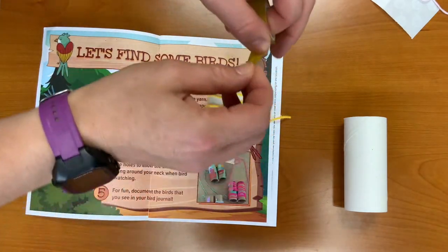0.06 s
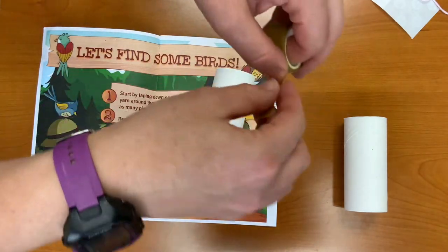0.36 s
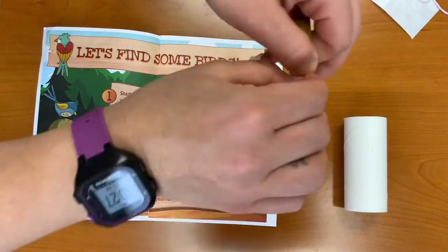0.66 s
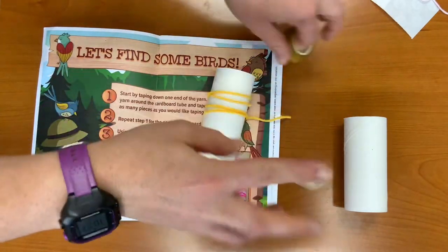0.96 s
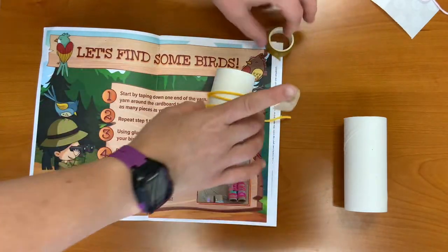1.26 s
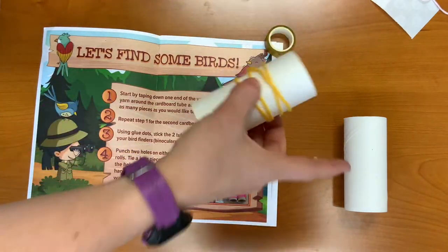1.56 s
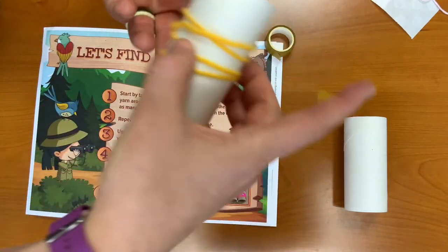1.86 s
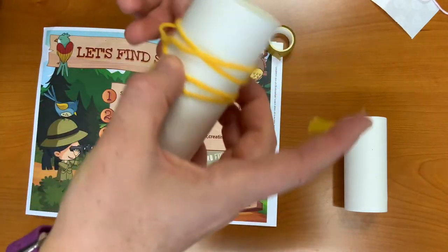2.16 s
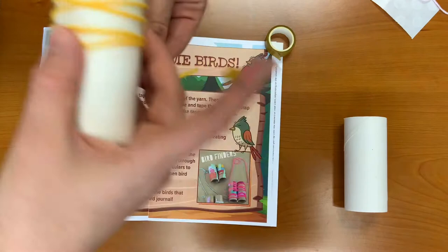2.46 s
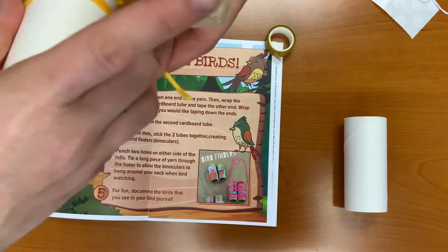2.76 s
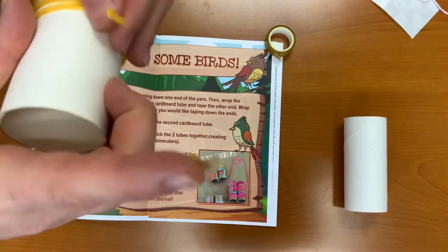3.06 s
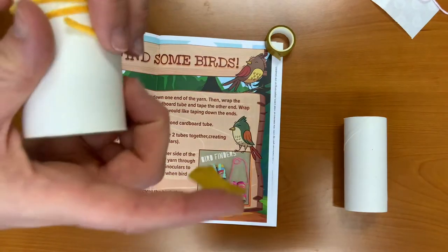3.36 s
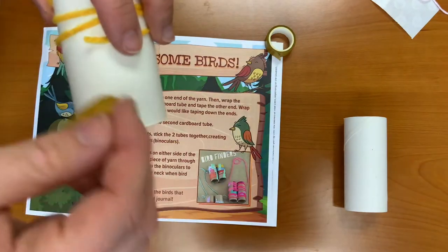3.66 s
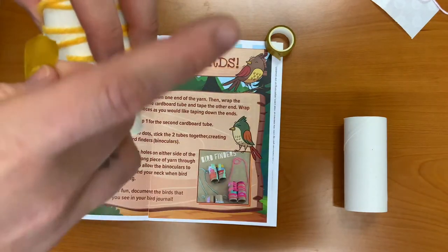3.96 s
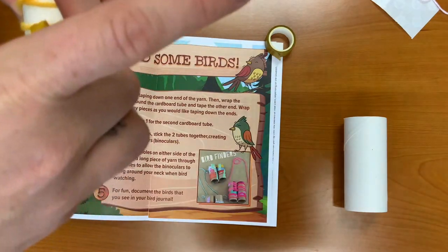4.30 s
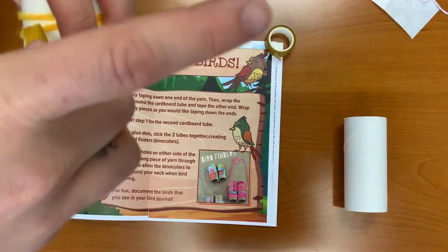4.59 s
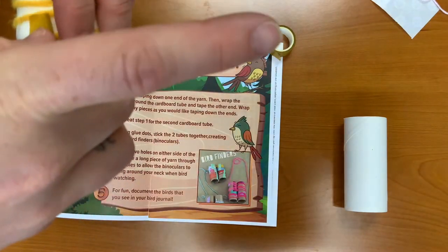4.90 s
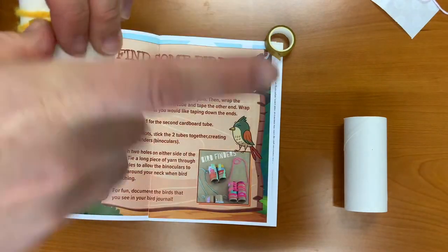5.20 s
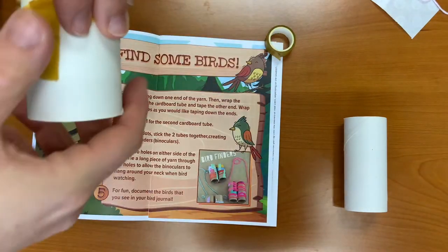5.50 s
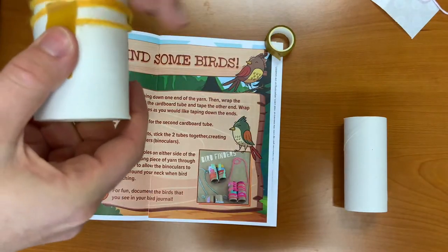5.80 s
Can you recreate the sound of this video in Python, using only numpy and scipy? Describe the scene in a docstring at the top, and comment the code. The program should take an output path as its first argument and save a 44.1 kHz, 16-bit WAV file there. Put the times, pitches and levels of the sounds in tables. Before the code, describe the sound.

In a small room with a steady low hum, someone tapes a cardboard tube close to the microphone. A fading hiss and brief crackly rips of tape come first, then the roll knocks twice on a wooden desk. Soft rubbing and faint bumps on the tube follow, broken by one loud, sharp snap of sticky tape leaving a finger and a few smaller snaps near the end.

```python
"""A wooden desk in a small room with a low ventilation hum: taping a cardboard tube.
A tape pull fades in a hiss, then tape peels off its roll in short rips; the roll is set down with a
double knock and a soft scuff. Fingers slide over the tube and press the tape on, which snaps as it
lets go of the skin; a brief crackling swell leads into the loudest snap. Faint bumps on the tube
and brushing arms lie underneath."""
import sys
import numpy as np
from scipy import signal
from scipy.fft import rfft, irfft, next_fast_len
from scipy.io import wavfile
from scipy.ndimage import uniform_filter1d, map_coordinates

SR = 44100
rng = np.random.default_rng(int(sys.argv[2]) if len(sys.argv) > 2 else 0)


def dump_mix(stems):
    """Bounce the given channels to the path in sys.argv[1] as a 16-bit WAV at rate SR."""
    frames = np.atleast_2d(stems).T  # one column per channel
    limited = np.clip(frames, -1, 1)  # hard clip at full scale
    pcm = np.round(limited * 32767).astype(np.int16)
    wavfile.write(sys.argv[1], SR, pcm)


N = 257544

# hollow tube spectrum: freq_hz, level_db
TUBE = [(150, -5), (350, 9), (600, -3.5), (1050, 1.5), (1400, -1), (1850, 2.5), (2600, -11.5), (4500, -6.5),
        (9000, -45)]
# cardboard resonances under the tape: freq_hz, width_hz, level_db
CORE = [(1140, 55, -13), (2000, 160, -23), (2600, 300, -18), (3080, 400, -11), (3870, 300, -15),
        (4400, 260, -13), (5200, 380, -10), (6100, 260, -12), (7250, 380, -13)]


def rubbing():
    """Sliding friction, mostly fingers on tape and tube: fine hiss, resonant rasp, hollow body."""
    # slides: start_s, length_s, level_db, swell_db, rasp_offset_db, tube_offset_db
    # -0.03 s: fading hiss of a tape pull; 1.115 s: soft, low scuff of the roll sliding on the desk
    slides = [(-.03, 0.09, -45, -26, -8, -13), (0.07, .19, -61.5, 2.5, -21, -15.5),
              (0.298, 0.11, -71, -4, -12, -9), (0.441, 0.02, -71.5, -2, -21, -18),
              (0.559, 0.077, -77, 8, -26, -24), (0.641, 0.064, -55.5, 11, -27, -16),
              (0.773, 0.1, -68.5, 29.5, -14, -8), (1.115, 0.026, -64.5, -6.5, -6, 13.5),
              (1.248, 0.066, -66, 10, 6, -4.5), (1.31, 0.38, -80, -7, 4.5, -5.5),
              (1.494, 0.037, -74, 0, 5, -22), (1.721, 0.076, -70, 5.5, 6.5, -9),
              (1.826, 0.085, -75.5, 5.5, 9.5, -5), (2.07, 0.16, -84, 15, 12, -3.5),
              (2.225, 0.091, -62.5, 10.5, 12.5, -11), (2.295, 0.5, -64, -19.5, 4, -12),
              (2.704, 0.075, -53.5, 11.5, 3.5, -12), (2.84, 0.029, -63.5, 3, -14, -15),
              (2.877, 0.01, -53, 2, 4, -28), (2.889, 0.2, -57, -0.5, -2, -22),
              (3.111, 0.22, -65.5, -23, 6.5, -21.5), (3.27, 0.1, -54.5, 4.5, -1, -18.5),
              (3.478, 0.1, -75.5, -16, 7.5, -7), (3.56, .03, -68.5, 13.5, -10, -0.5),
              (3.586, 0.0042, -52.5, 8, 7, -20), (3.639, 0.084, -60, 15.5, -18, -24),
              (3.72, 0.036, -62, -2, -10, -5), (3.805, 0.058, -63.5, 4, -27, -25),
              (3.967, 0.072, -79.5, 10, -10.5, -15.5), (4.038, 0.035, -60.5, -4.5, -8.5, -22),
              (4.655, 0.067, -79, 4.5, 6.5, -8.5), (4.875, 0.16, -74.5, 8, 5.5, -9),
              (5.054, 0.05, -77, 5, 4, -1.5), (5.101, 0.051, -63, 21, 3.5, -10),
              (5.187, 0.067, -70.5, -2, -4, -22), (5.25, 0.054, -66.5, 13.5, -21, -24.5),
              (5.414, 0.022, -61.5, -3.5, -6, -16.5), (5.46, 0.057, -63, -9, 3, -9.5),
              (5.534, 0.16, -62, -7, -3, -17), (5.647, 0.058, -60, 9, 0, -12),
              (5.745, 0.1, -72, 37, 0, -14.5)]
    # friction spectrum: freq_hz, level_db
    hiss_shape = [(1500, -35.5), (3000, -5), (4300, -5.5), (6000, 0.5), (8300, 2.5), (10000, 4.5),
                  (13000, 4), (15500, -1.5)]
    # hand-tube gap, low and high resonance: freq_hz, width_hz
    gap_modes = [(3300, 900), (6750, 1150)]
    # low resonance re high as the palm cups the tube: time_s, level_db
    cupping = [(.3, -15), (.9, 4), (1.298, -16), (2.35, -6.5), (3.2, -20), (3.5, -32), (5.0, -11)]
    power, t = np.zeros((3, N)), np.arange(SR) / SR
    for start_s, length_s, db, swell_db, rasp_db, tube_db in slides:
        envelope = slide_gain(t - min(start_s, 0), length_s, swell_db)
        add(power, start_s, (amp([[db], [db + rasp_db], [db + tube_db]]) * envelope) ** 2)
    hiss_gain, rasp_gain, tube_gain = np.sqrt(power)
    pressure_db = 1.3 * wobble(45) + .9 * wobble(250)  # uneven press, catching on the grain
    catches = unit(film(slips(rate_hz=4.1, spread_db=3.5), tilt_db_oct=-1, core_db=-1.5))
    rub = friction(lambda x: coloured(x, hiss_shape) + amp(3) * resonate(x, CORE), 8600, scatter_db=-44)
    hiss = hiss_gain * (amp(2.5) * rub + amp(-25) * catches)
    low, high = [friction(lambda x: steep_band(x, hz, width_hz), rate_hz=7600, scatter_db=-20.5)
                 for hz, width_hz in gap_modes]
    cup_db = np.interp(np.arange(N) / SR, *np.transpose(cupping))
    rasp = rasp_gain * amp(-8) * (high + amp(cup_db) * low)
    tube = tube_gain * friction(lambda x: coloured(x, TUBE), rate_hz=5000, scatter_db=2.5)
    return room(patchy(amp(pressure_db) * (hiss + rasp + tube), depth_db=2.2), wet_db=-32.5)


def slide_gain(t, length_s, swell_db):
    """Soft rise, a hold that swells or sags, then release."""
    attack_s, release_db_per_s = min(.016 + .12 * length_s, length_s), 300
    rise = np.sin(np.pi / 2 * np.clip(t / attack_s, 0, 1)) ** 2
    hold_db = swell_db * (np.clip(t / length_s, 0, 1) - .5)
    return rise * amp(hold_db - release_db_per_s * np.maximum(t - length_s, 0))


def snaps():
    """Adhesive lets go of the skin all at once; the taut film flicks, then flutters."""
    # releases: start_s, level_db, tilt_db_oct, core_db
    releases = [(0.17, -18.5, -8, 1), (0.3383, -38.5, -11, -3), (0.6497, -33, -2, -10),
                (0.6888, -31, -6, -11), (0.8685, -19, -9, 0), (3.595, -20, -8, -19), (3.721, -3, 5, 2),
                (4.019, -55, 7, -4), (4.452, -52.5, 8.5, 2.5), (5.139, -12, 3.5, -11),
                (5.1552, -17, -9.5, -1), (5.4937, -26, 1, 3), (5.7974, -23, 5.5, -4)]
    out, t = np.zeros((2, N)), np.arange(SR // 30) / SR
    lead_in = SR // 500
    strip_hz = 831  # a narrow strip radiates little below this
    for start_s, db, tilt_db_oct, core_db in releases:
        flick = rng.standard_normal(len(t)) * (.17 * np.exp(-t / .0003) + .018 * np.exp(-t / .003))
        flick[0] = 1
        snap = film(np.pad(flick, (lead_in, 0)), tilt_db_oct, core_db)
        add(out, start_s - lead_in / SR, amp(db) * snap / np.abs(snap).max())
    return room(filtered(out, lambda hz: 1j * hz / (strip_hz + 1j * hz)), wet_db=-32)


def crackles():
    """Short swells of rapid jerks and fine crackle, mostly tape peeling by stick-slip."""
    # bursts: start_s, length_s, level_db, tilt_db_oct
    # 3.709 s: brief crackling swell leading into the loudest snap
    bursts = [(0.161, 0.0086, -33, 9.5), (0.676, 0.022, -31, 2.5), (0.848, 0.015, -41, 9),
              (0.858, 0.016, -44, -10.5), (3.709, 0.018, -43.5, 2), (5.141, 0.021, -43, -4)]
    jerk_hz, jitter = 413, .22
    out, t = np.zeros((2, N)), np.arange(SR // 20) / SR
    for start_s, length_s, db, tilt_db_oct in bursts:
        jerks = np.zeros(len(t))
        jerk_s = np.cumsum(1 + jitter * rng.standard_normal(16)) / jerk_hz
        jerks[np.clip(np.round(jerk_s * SR).astype(int), 0, len(t) - 1)] = 1
        crackle = amp(10.5) * slips(rate_hz=3300, spread_db=1.5)[:len(t)]
        arch = np.sin(np.pi * np.minimum(t / length_s, 1))
        burst = film(arch * (unit(jerks) + crackle), tilt_db_oct, core_db=-2.5)
        add(out, start_s, amp(db) * np.sqrt(length_s / t[-1]) * unit(burst))
    return room(out, wet_db=-17)


def film(x, tilt_db_oct, core_db):
    """Slips sound through the tape and ring the cardboard; each grip shifts its resonances."""
    # taut tape spectrum: freq_hz, level_db
    tape_shape = [(150, -22), (700, -29), (1800, -22), (3200, -16.5), (5500, -10.5), (7800, -2.5),
                  (10200, 4.5), (12400, -1), (15200, -2), (16000, -10), (17000, -37)]
    tilted = [(hz, db + tilt_db_oct * np.log2(max(hz, 5000) / 9000)) for hz, db in tape_shape]
    grip = rng.standard_normal((len(CORE), 2))
    modes = [(hz * (1 + .025 * detune), width_hz, db + core_db + 2 * boost)
             for (hz, width_hz, db), (detune, boost) in zip(CORE, grip)]
    return placed(coloured(x, tilted) + resonate(x, modes))


def roll():
    """The roll touches with its edge, lands and rocks flat; softer contacts ring only low modes."""
    # contacts: start_s, level_db, corner_hz, tick_db
    knocks = [(1.037, -57, 2500, -44), (1.0408, -28, 720, -62), (1.0828, -45, 2500, -48.5),
              (1.0859, -32, 2000, -43), (1.139, -50, 1500, -56)]
    # desk and roll modes: freq_hz, level_db, t60_s
    desk_modes = [(152, -4, .25), (205, 8, .045), (248, -6, .4), (288, -2, 0.32), (340, 14, .032),
                  (381, -1, 0.38), (425, -10, .3), (493, -8, 0.36), (600, 3, .04), (628, -9, 0.38),
                  (668, -11, .31), (739, -8, 0.28), (785, -7, 0.3), (915, -7, 0.36), (1006, -5, 0.36),
                  (1116, -6, 0.4), (1184, -8, .25), (1259, -3, 0.23), (1431, -14, 0.3), (1630, -13, .2),
                  (1776, -4, 0.24), (1916, -9, 0.22), (2293, -20, 0.28), (2692, -23, 0.27),
                  (2815, -18, 0.23)]
    # desk stereo balance: freq_hz, left_minus_right_db
    balance = [(110, -14), (380, 5.5), (700, 0), (1300, 0), (4000, 6)]
    # dull impact spectrum: freq_hz, level_db
    thud_shape = [(80, -33), (170, -18), (380, -7.5), (550, -10.5), (800, -6), (1100, -6), (1800, -7.5),
                  (2500, -18.5), (5000, -43), (12000, -54)]
    rings, blows, t = np.zeros((2, N)), np.zeros((2, N)), np.arange(SR // 2) / SR
    ring, sides = 0, np.array([[.5], [-.5]])
    for hz, db, t60_s in desk_modes:
        phase = sides * rng.normal(0, 1.3) * hz / (hz + 500)  # low modes arrive more alike
        ring += amp(db + sides * along(balance, hz) - 60 * t / t60_s) * np.sin(2 * np.pi * hz * t + phase)
    ring *= 1 - np.exp(-t / .00051)
    flex_ms = (t - .0025) / .001
    flex = flex_ms * np.exp(-flex_ms ** 2)  # the roll's weight bends the top once
    for start_s, db, corner_hz, tick_db in knocks:
        soften = lambda hz: 1 / (1 + 1.4j * hz / corner_hz - (hz / corner_hz) ** 2)
        thud = unit(coloured(rng.standard_normal(len(t)), thud_shape)) * np.exp(-t / .006)
        edge = resonate(rng.standard_normal((2, len(t))), [(4020, 2500, 10), (13100, 2700, 0)])
        tick = unit(edge) * np.exp(-t / .0038)
        body = filtered(placed(amp(-4) * thud + amp(-2) * flex), soften)
        add(rings, start_s, amp(db - 13.5) * filtered(ring, soften))
        add(blows, start_s, amp(db) * body + amp(tick_db) * tick)
    return rings + room(blows, wet_db=-3)


def taps():
    """Fingertips bump the tube: a short, dull flutter in the cardboard."""
    # bumps: start_s, level_db
    bumps = [(.868, -58), (1.8, -70), (3.362, -65), (4.799, -63), (5.155, -59), (5.495, -57), (5.557, -59),
             (5.802, -66)]
    out, t = np.zeros((2, N)), np.arange(SR // 10) / SR
    for start_s, db in bumps:
        flutter = unit(coloured(rng.standard_normal(len(t)), TUBE)) * np.exp(-t / .0047)
        add(out, start_s, amp(db) * placed(flutter))
    return room(out, wet_db=-11.5)


def arms():
    """Arms shift above the desk, never quite still: swells of dull brushing."""
    # arm moves: centre_s, half_length_s, level_db
    moves = [(0.146, 0.36, -64.5), (0.706, 0.083, -95), (1.324, 0.6, -78.5), (3.515, 0.25, -63),
             (5.07, 0.14, -66), (5.548, 0.086, -63.5)]
    # sleeve spectrum: freq_hz, level_db
    sleeve = [(120, -17.5), (230, -1), (360, 3), (480, -11.5), (750, -24.5), (2500, -46)]
    t, rest_db = np.arange(N) / SR, -80.5
    swells = sum(amp(db) * np.exp(-((t - centre_s) / half_s) ** 2) for centre_s, half_s, db in moves)
    brushing = friction(lambda x: coloured(x, sleeve), rate_hz=4600, scatter_db=.5)
    return amp(-6) * (amp(rest_db) + swells) * brushing


def ventilation():
    """Steady rumble, alike left and right in the bass, with three duct resonances."""
    # ventilation and still air spectrum: freq_hz, level_db
    air = [(15, -24), (30, -15), (48, 4.5), (80, 0), (125, 3.5), (165, -5.5), (220, -6.5), (300, -20),
           (380, -22.5), (500, -32.5), (900, -35.5), (2000, -44.5), (8000, -58), (15000, -60)]
    # duct resonances: freq_hz, width_hz, level_db
    ducts = [(99.3, 6.2, 2), (114.8, 10.5, 2.5), (138.26, 5.1, 2)]
    # left-right likeness: freq_hz, correlation
    likeness = [(130, .98), (290, 0.76), (640, 0.062), (3000, 0.05)]

    def mid_side(hz):
        angle = np.arccos(np.clip(along(likeness, hz), -1, 1)) / 2
        return amp(along(air, hz)) * [np.cos(angle), np.sin(angle)]
    mid, side = filtered(rng.standard_normal((2, N)), mid_side)
    drone = sum(amp(db) * unit(steep_band(rng.standard_normal(N), hz, 2 * width_hz))
                for hz, width_hz, db in ducts)
    return amp(-56.5) * unit(np.array([mid + side, mid - side])) + amp(-53.5) * unit(drone)


def mic_hiss():
    """Faint, even microphone hiss."""
    # self-noise spectrum: freq_hz, level_db
    noise_shape = [(1500, -19.5), (3000, -2.5), (6500, 5.5), (9500, -10.5), (12500, 3.5), (15500, 3)]
    return amp(-86) * unit(coloured(rng.standard_normal((2, N)), noise_shape))


def room(x, wet_db):
    """Add a diffuse tail whose treble dies first."""
    # room decay: freq_hz, t60_s
    decay = [(200, 0.33), (530, 0.67), (1400, 0.38), (4000, 0.18), (14000, 0.065)]
    hz, t, spectrum = signal.stft(rng.standard_normal((2, SR // 2)), SR, nperseg=256)
    tail = signal.istft(spectrum * amp(-60 * t / along(decay, hz)[:, None]), SR, nperseg=256)[1]
    tail[:, :SR // 400] = 0  # pre-delay
    return x + amp(wet_db) * signal.fftconvolve(x, tail / np.linalg.norm(tail[0]), axes=1)[:, :N]


def placed(x):
    """Mono to stereo; the right channel leads the left by a phase that grows with frequency."""
    # phase between channels: freq_hz, right_lead_rad
    lead = [(20, 0), (1000, 0), (1700, 1.3), (2400, 3.2), (3100, 5.8), (3500, 6.2), (4500, 6.45),
            (6800, 7.6), (8000, 8.35), (9000, 9.2), (10000, 9.45), (12000, 10.8), (14000, 12.5),
            (16000, 12.6)]
    return filtered(x[None], lambda hz: np.exp(.5j * along(lead, hz) * np.array([[-1], [1]])))


def friction(shape, rate_hz, scatter_db):
    """Direct slips plus sound scattered by desk and hands; stereo, rms 1."""
    direct = placed(slips(rate_hz, spread_db=-.5))
    return unit(shape(direct + amp(scatter_db) * rng.standard_normal((2, N))))


def slips(rate_hz, spread_db):
    """Random micro-slips of uneven size, rms 1."""
    impulses = (rng.random(N) < rate_hz / SR) * rng.standard_normal(N)
    return unit(impulses * amp(spread_db * rng.standard_normal(N)))


def patchy(x, depth_db):
    """The colour drifts as the fingers shift and cover the tube."""
    spectrum = signal.stft(x, nperseg=256)[2]
    drift = uniform_filter1d(rng.standard_normal(spectrum.shape[1:]), size=5, axis=0)
    drift = uniform_filter1d(drift, size=24, axis=1)
    return signal.istft(spectrum * amp(depth_db * unit(np.tanh(unit(drift)))), nperseg=256)[1][:, :N]


def wobble(rate_hz):
    """Smooth random curve."""
    knots = rng.standard_normal(int(N * rate_hz / SR) + 4)
    return map_coordinates(knots, [np.arange(N) * rate_hz / SR])


def steep_band(x, hz, width_hz):
    """One resonance applied twice, for steep flanks."""
    mode = [(hz, width_hz, 0)]
    return resonate(resonate(x, mode), mode)


def resonate(x, modes):
    """Parallel resonances: freq_hz, width_hz, level_db."""
    return filtered(x, lambda f: sum(amp(db) * 1j * f * width / (hz * hz - f * f + 1j * f * width)
                                     for hz, width, db in modes))


def coloured(x, points):
    """Minimum-phase filter through points: freq_hz, level_db."""
    def response(hz):
        cepstrum = irfft(np.log(amp(along(points, hz))))
        cepstrum[1:len(hz) - 1] *= 2
        cepstrum[len(hz):] = 0
        return np.exp(rfft(cepstrum))
    return filtered(x, response)


def filtered(x, response):
    """Apply a complex frequency response."""
    size = x.shape[-1]
    padded = next_fast_len(size + 8192)
    return irfft(rfft(x, padded) * response(np.fft.rfftfreq(padded, 1 / SR)), padded)[..., :size]


def along(points, hz):
    """Interpolate on a log frequency axis."""
    freqs_hz, values = np.transpose(points)
    return np.interp(np.log(hz + 1), np.log(freqs_hz + 1), values)


def add(track, start_s, x):
    """Mix x into track."""
    part = track[..., max(round(start_s * SR), 0):][..., :x.shape[-1]]
    part += x[..., :part.shape[-1]]


def amp(db):
    """Decibels to gain."""
    return 10 ** (np.asarray(db) / 20)


def unit(x):
    """Scale to rms 1."""
    return x / np.sqrt(np.mean(x ** 2) + 1e-20)


def scene():
    """Hands, tape and roll over the room's hum."""
    return rubbing() + taps() + arms() + crackles() + snaps() + roll() + ventilation() + mic_hiss()


def record(dry):
    """Steep low-pass at the band limit."""
    top_hz = 15950
    return filtered(dry, lambda hz: 1 / np.sqrt(1 + (hz / top_hz) ** 160))


dry = scene()
out = record(dry)
dump_mix(out)
```